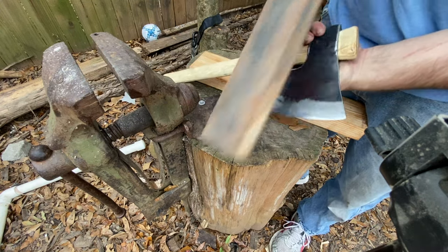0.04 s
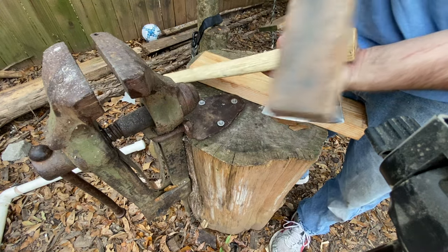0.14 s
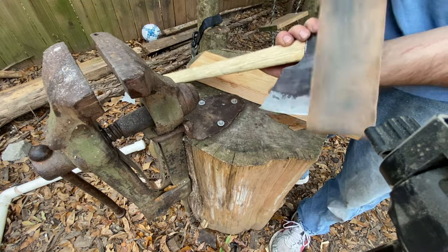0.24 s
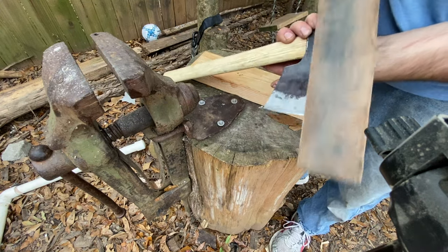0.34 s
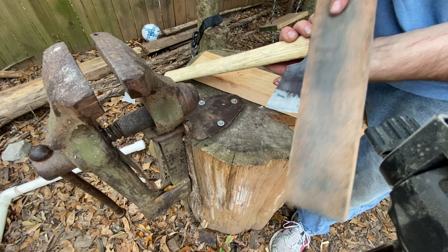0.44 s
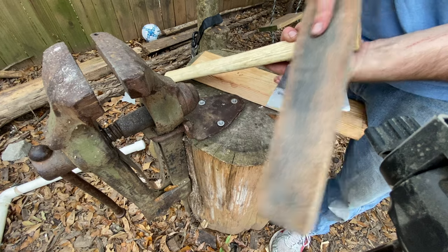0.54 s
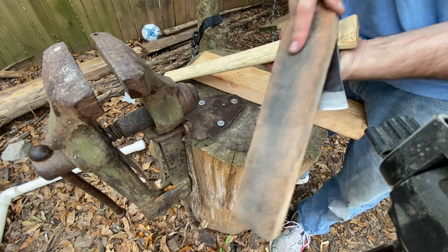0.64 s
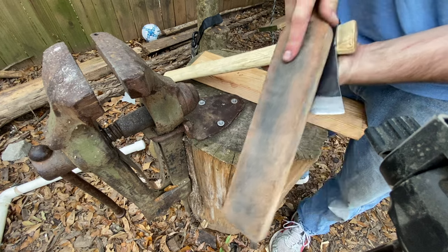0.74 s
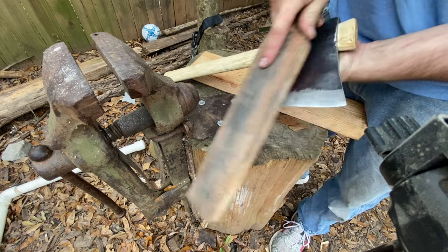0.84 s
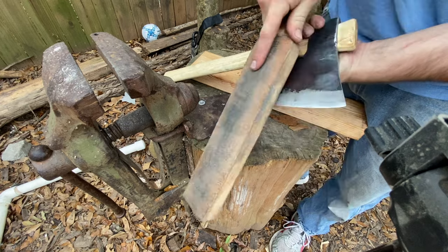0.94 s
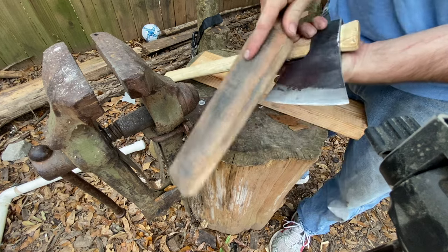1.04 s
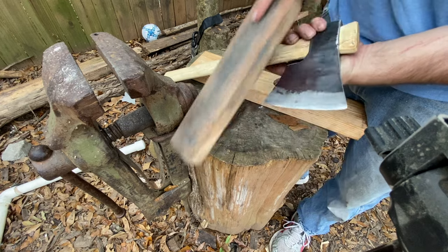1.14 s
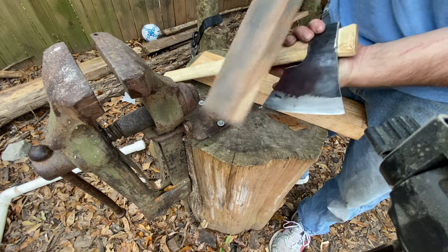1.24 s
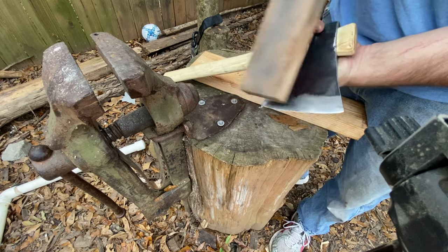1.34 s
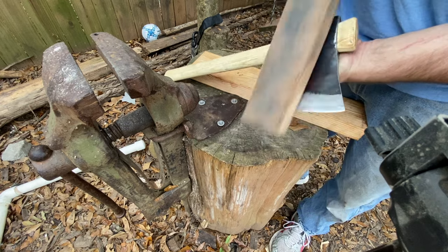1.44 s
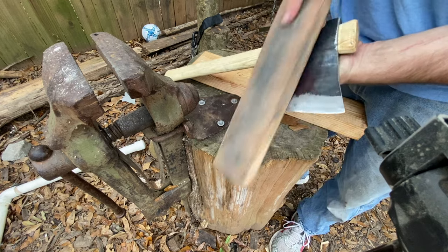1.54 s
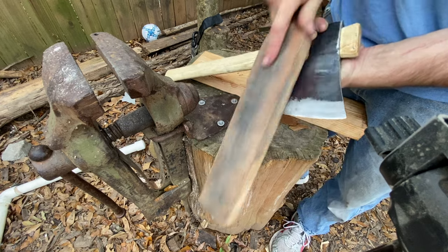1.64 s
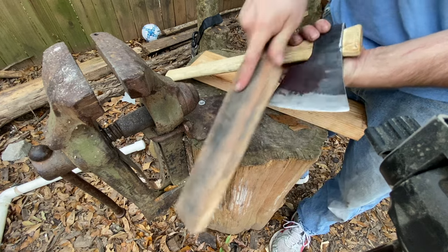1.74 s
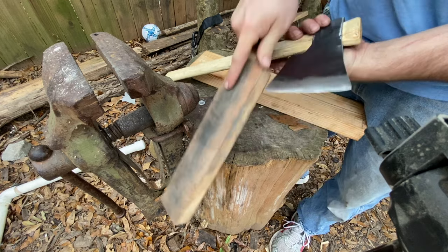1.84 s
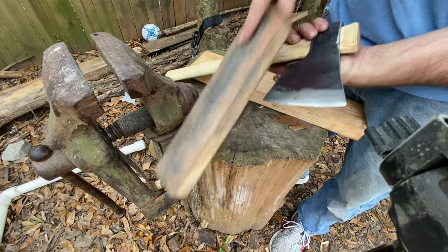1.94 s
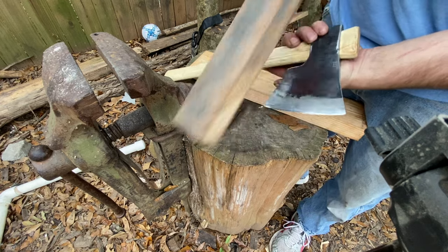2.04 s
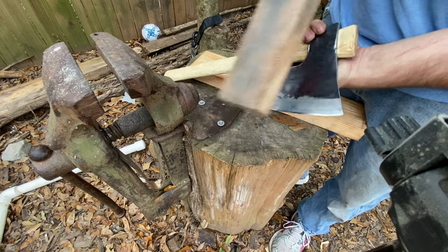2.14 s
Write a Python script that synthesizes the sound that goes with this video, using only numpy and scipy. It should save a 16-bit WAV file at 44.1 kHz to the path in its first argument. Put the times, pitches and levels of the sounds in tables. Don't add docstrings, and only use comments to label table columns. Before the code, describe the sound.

Wooden paddle knocks twice on a steel axe head, with thin scraping drags between, outdoors

```python
import sys
import numpy as np
from scipy import signal
from scipy.fft import rfft, irfft, next_fast_len
from scipy.io import wavfile
from scipy.ndimage import uniform_filter1d, map_coordinates

SR = 44100
rng = np.random.default_rng(int(sys.argv[2]) if len(sys.argv) > 2 else 0)


def level_to_linear(level):
    exponent = np.asarray(level, float) / 20
    return 10 ** exponent


def master(y):
    cut = np.clip(np.atleast_2d(y).T, -1, 1)
    pcm = np.round(cut * 32767)
    wavfile.write(sys.argv[1], SR, pcm.astype(np.int16))


N = 97020

WOOD_LAG_S = 0.00012


def unit(x):
    return x / np.sqrt(np.mean(x ** 2) + 1e-20)


def along(points, hz):
    f, v = np.transpose(points)
    return np.interp(np.log(hz + 1), np.log(f + 1), v)


def wobble(rate):
    knots = rng.standard_normal(int(N * rate / SR) + 4)
    return map_coordinates(knots, [np.arange(N) * rate / SR])


def filtered(x, response):
    m = next_fast_len(x.shape[-1] + 4096)
    spectrum = rfft(x, m) * response(np.fft.rfftfreq(m, 1 / SR))
    return irfft(spectrum, m)[..., :x.shape[-1]]


def panned(x, pan_db):
    return np.atleast_2d(x) * level_to_linear(np.array([[pan_db / 2], [-pan_db / 2]]))


def add(out, s, x, pan_db):
    k = max(round(s * SR), 0)
    part = panned(np.atleast_2d(x)[:, :N - k], pan_db)
    out[:, k:k + part.shape[1]] += part


def swell(middle_s, length_s):
    t = np.arange(N) / SR
    return np.exp(-(2 * (t - middle_s) / length_s) ** 4)


def hiss(hz, octaves, size):
    def bell(f):
        return np.exp(-(np.log2((f + 1) / hz) / octaves) ** 2 / 2)
    return unit(filtered(rng.standard_normal(size), bell))


def rush(spectrum, patchy_db):
    # (frequency [Hz], left-right likeness [-1 to 1])
    likeness = [(60, 0.92), (180, 0.97), (550, -0.33), (1650, 0.15), (4970, -0.084), (15000, 0.37)]
    z = signal.stft(rng.standard_normal((2, N)), nperseg=512)[2]
    field = uniform_filter1d(rng.standard_normal(z.shape[1:]), 6, 0)
    field = uniform_filter1d(field, 10, 1)
    pair = signal.istft(z * level_to_linear(patchy_db * unit(field)), nperseg=512)[1][:, :N]

    def mid_side_gain(hz):
        turn = np.arccos(np.clip(along(likeness, hz), -1, 1)) / 2
        return level_to_linear(along(spectrum, hz)) * [np.cos(turn), np.sin(turn)]

    mid, side = filtered(pair, mid_side_gain)
    return unit(np.array([mid + side, mid - side]))


def distance():
    # (frequency [Hz], density [dB per Hz])
    rumble_curve = [(13, -51), (22, -29.5), (40, -9), (70, -2), (110, -4), (129, -7.5), (151, -13),
                    (172, -17.5), (300, -24.5), (390, -45), (660, -120)]
    # (frequency [Hz], density [dB per Hz])
    air_curve = [(120, -13.5), (200, -1.5), (263, -14), (312, -8), (531, -4.5), (711, -3.5), (2610, -19),
                 (6940, -22.5), (12000, -43), (15600, -85), (22000, -120)]
    rumble = level_to_linear(-45 + 1.18 * wobble(3.7)) * rush(rumble_curve, patchy_db=0.7)
    air = level_to_linear(-53.5 + 0.19 * wobble(6.26)) * rush(air_curve, patchy_db=1.1)
    return panned(rumble + air, 2.5)


def sing(x):
    # (frequency [Hz], width [Hz], lift [dB])
    steel_bands = [(5100, 60, 0), (7210, 50, 4), (9060, 46, 2), (11370, 33, 1.5)]
    return filtered(x, lambda f: 1 + sum(level_to_linear(db) / (1 + ((f - hz) / w) ** 2) for hz, w, db in steel_bands))


def drag():
    # (time [s], level [dB])
    slide = [(0, -95), (.05, -74), (.235, -69), (.245, -57), (0.449, -61), (.63, -61.5), (.7, -69),
             (.85, -65.5), (1, -70), (1.2, -69.5), (1.37, -67), (1.385, -58), (1.55, -57), (1.74, -62),
             (1.79, -72), (1.95, -80), (2.1, -72), (2.2, -68)]
    # (frequency [Hz], density [dB per Hz])
    scrape_curve = [(1060, -38.5), (1800, -8), (2400, -2.5), (3900, -8), (9310, -4), (11000, -7.5),
                    (14300, -39), (22000, -120)]
    s, db = np.transpose(slide)
    unsteady_db = 1.4 * wobble(61) + 0.7 * wobble(14)
    loudness = level_to_linear(np.interp(np.arange(N) / SR, s, db) + unsteady_db)
    scrape = sing(rush(scrape_curve, patchy_db=0.6))
    top_band = level_to_linear(-9) * hiss(13400, 0.18, size=(2, N))
    return panned(loudness * (scrape + top_band), 2.5)


def grit():
    # (time [s], level [dB], centre [Hz], t60 [s], left over right [dB])
    ticks = [(0.0375, -46, 1250, 0.02, 5), (.038, -56, 2600, .012, 6), (.057, -62, 7000, .01, 9),
             (0.038, -55.5, 6800, 0.01, 11), (.047, -49, 900, 0.018, 12), (0.0615, -56, 1900, 0.022, 15),
             (.076, -56, 3000, .015, 18), (.125, -61, 5000, .01, 9), (0.1415, -61, 7360, 0.052, 5),
             (.192, -54, 4860, 0.017, 18.5), (1.2661, -50, 4200, 0.025, 17.5),
             (1.2665, -49.5, 9900, .01, 6), (1.266, -50, 820, 0.04, 7), (1.5315, -45, 11001, 0.032, 4),
             (1.534, -50, 3000, 0.013, -4), (1.656, -47.5, 1870, 0.024, 3), (1.672, -53, 10000, .02, 4),
             (1.871, -60, 4700, .012, 4), (1.972, -63, 8000, .01, 6), (2.028, -61, 7000, .02, 8),
             (2.115, -61, 7500, .03, 8), (2.157, -61, 8000, .02, 8)]
    out, t = np.zeros((2, N)), np.arange(SR // 10) / SR
    for s, db, hz, t60, pan_db in ticks:
        add(out, s, level_to_linear(db - 60 * t / t60) * hiss(hz, 0.4, size=len(t)), pan_db)
    return out


def sleeves():
    # (middle [s], length [s], level [dB], centre [Hz], left over right [dB])
    rustles = [
        (0.153, 0.026, -59.5, 7000, 15),
        (0.576, 0.059, -63, 7200, 10),
        (0.77, .04, -67, 9500, 1),
        (.843, 0.028, -57.5, 3500, -1),
        (.84, 0.03, -59, 10000, 0),
        (1.05, 0.095, -57, 6500, 11),
        (1.045, 0.08, -64, 2800, 12),
        (1.476, 0.079, -60, 5450, 4),
        (1.653, 0.062, -62, 6840, 11),
        (2.14, 0.2, -65, 7200, 12),
    ]
    out = np.zeros((2, N))
    for s, length, db, hz, pan_db in rustles:
        grain = unit(level_to_linear(2.5 * wobble(400)))
        add(out, 0, level_to_linear(db) * swell(s, length) * grain * hiss(hz, 0.328, size=(2, N)), pan_db)
    return out


def grip(hz, since_s):
    return level_to_linear(-1500 * np.maximum(since_s, 0) * (hz < 800))


def blow_noise(t):
    crack = level_to_linear(-23.5 - 60 * t / 0.005) * hiss(9500, 0.6, size=len(t))
    dust = level_to_linear(-29 - 60 * t / 0.094) * hiss(4410, 0.89, size=(2, len(t)))
    rise = 1 - np.exp(-t / 0.00051)
    thud = level_to_linear(-13 - 60 * t / 0.043) * rise * hiss(900, 0.9, size=(2, len(t)))
    return thud + crack + dust


def struck(blows, modes, lag_s, held_s, turns, noise_db):
    out, t = np.zeros((2, N)), np.arange(SR // 2) / SR
    hz, t60, *swing = np.transpose(modes)[:, :, None]
    u = np.maximum(t - np.array([lag_s, 0])[:, None, None], 0)
    build_up = 1 - np.exp(-u * hz / turns)
    ring = np.array(swing) * level_to_linear(-60 * u / t60) * np.sin(2 * np.pi * hz * u) * build_up
    for s, db, edge_hz in blows:
        push = 1 / (1 + (hz / edge_hz) ** 2)
        tone = (ring * grip(hz, t + s - held_s) * push).sum(1)
        add(out, s, level_to_linear(db) * (tone + level_to_linear(noise_db) * blow_noise(t)), 0)
    return out


def first_landing():
    # (frequency [Hz], t60 [s], left swing [signed], right swing [signed])
    end_modes = [(113, 0.195, 0.054, 0.058), (166, 0.181, -0.125, -0.12), (314, 0.08, 0.613, 0.383),
                 (408, 0.051, -0.672, -0.417), (513, 0.081, 0.143, 0.256), (688, 0.181, -0.037, 0.215),
                 (790, 0.018, 1.108, 2.118), (888, 0.072, 1.162, 1.814), (1163, 0.013, -3.457, -5.173),
                 (1273, 0.024, 2.067, 1.647), (1368, 0.095, 0.876, -1.162), (1433, 0.052, -2.301, -0.053),
                 (2366, 0.06, 0.952, -0.649), (2770, 0.024, 0.413, -0.415)]
    # (frequency [Hz], t60 [s], left swing [signed], right swing [signed])
    end_flat_modes = [(99, 0.054, 0.501, 0.466), (218, 0.017, 0.679, 0.596), (363, 0.016, 1.157, 0.943),
                      (431, 0.012, 2.025, 1.337), (582, 0.015, 0.412, 0.99), (760, 0.015, 1.062, -0.018),
                      (961, 0.06, -0.124, -0.127), (1217, 0.016, -0.505, -0.413),
                      (1350, 0.02, 1.61, -1.079), (1788, 0.007, 0.582, -0.679),
                      (2129, 0.021, 0.291, -0.182), (2861, 0.029, 0.413, 0.122)]
    # (time [s], level [dB], hardness as where the push fades [Hz])
    end_blows = [
        (0.23996, -3.0, 860),
        (0.24164, -16.5, 8180),
        (0.24389, -20.6, 8180),
    ]
    # (time [s], level [dB], hardness as where the push fades [Hz])
    end_rebounds = [
        (0.24921, -9.0, 1460),
        (0.25491, -22.8, 8180),
        (0.25999, -9.5, 880),
        (0.26383, -16.4, 330),
        (0.268, -19.8, 770),
    ]
    knock = struck(end_blows, end_modes, WOOD_LAG_S, 0.273, turns=0.83, noise_db=-8)
    rebound = struck(end_rebounds, end_flat_modes, WOOD_LAG_S, 0.272, turns=1.11, noise_db=-12)
    return knock + rebound


def yard(x):
    # (frequency [Hz], t60 [s])
    yard_decay = [(200, 0.11), (1500, 0.16), (8000, 0.064)]
    hz, t, z = signal.stft(rng.standard_normal((2, SR // 4)), SR, nperseg=256)
    tail = signal.istft(z * level_to_linear(-60 * t / along(yard_decay, hz)[:, None]), SR, nperseg=256)[1]
    late = np.pad(x, ((0, 0), (200, 0)))
    return signal.fftconvolve(late, tail / np.linalg.norm(tail[0]), axes=1)[:, :N]


def axe_head():
    # (time [s], level [dB], frequency [Hz], t60 [s])
    after_rings = [
        (.26, -48, 1366, .41),
        (.27, -58, 2340, .36),
        (.241, -45, 3756, .077),
        (.241, -47, 3020, .061),
        (.265, -45, 665, .11),
        (.241, -44, 2150, .07),
        (1.377, -54, 3914, .14),
        (1.377, -56, 5300, .07),
        (1.3775, -33, 3000, .014),
        (1.455, -57, 1200, .07),
    ]
    out, t = np.zeros((2, N)), np.arange(N) / SR
    for s, db, hz, t60 in after_rings:
        add(out, s, level_to_linear(db - 60 * t / t60) * hiss(hz, 0.028, size=N), 1)
    return out


def squeaks():
    # (middle [s], length [s], level [dB], frequency [Hz])
    rubs = [
        (.786, .027, -62, 4550),
        (.78, .014, -65, 3950),
        (.773, .02, -67, 7200),
        (.837, .009, -61, 4700),
        (.842, .013, -60, 3600),
        (.851, .006, -60, 4800),
        (.848, .012, -60, 2500),
    ]
    out = np.zeros((2, N))
    for s, length, db, hz in rubs:
        add(out, 0, level_to_linear(db) * swell(s, length) * hiss(hz, 0.08, size=N), 1)
    return out


def second_landing():
    # (frequency [Hz], t60 [s], left swing [signed], right swing [signed])
    mid_modes = [(131, 0.107, 0.046, -0.009), (222, 0.111, -0.058, 0.001), (370, 0.013, 0.544, 0.053),
                 (504, 0.086, -0.105, -0.22), (564, 0.042, 1.004, 0.57), (632, 0.007, -2.262, -0.455),
                 (926, 0.021, -0.178, -0.198), (1261, 0.024, 0.503, 0.53), (1317, 0.092, 0.082, 0.016),
                 (1447, 0.01, -0.6, -0.596), (1983, 0.018, -0.08, -0.147), (2224, 0.007, -0.573, -0.51),
                 (2516, 0.007, -0.407, 0.295), (2745, 0.006, 0.623, 0.412)]
    # (frequency [Hz], t60 [s], left swing [signed], right swing [signed])
    mid_flat_modes = [(640, 0.04, 0.843, -0.286), (1367, 0.081, -0.036, 0.185), (2335, 0.04, 0.049, -0.012)]
    # (time [s], level [dB], hardness as where the push fades [Hz])
    mid_blows = [
        (1.37662, -12.0, 750),
        (1.37733, -3.4, 1480),
        (1.37751, -8.1, 8180),
        (1.37993, -6.4, 1040),
    ]
    # (time [s], level [dB], hardness as where the push fades [Hz])
    mid_rebounds = [
        (1.39807, -22.0, 8180),
    ]
    knock = struck(mid_blows, mid_modes, WOOD_LAG_S, 1.395, turns=0.1, noise_db=-13)
    rebound = struck(mid_rebounds, mid_flat_modes, WOOD_LAG_S, 1.395, turns=0.1, noise_db=-15)
    return knock + rebound


def steel_flick():
    # (frequency [Hz], t60 [s], left swing [signed], right swing [signed])
    steel_modes = [(760, 0.011, 1.6, 0.57), (520, 0.019, -1.45, -.75), (1326, 0.036, 0.24, 0.28),
                   (2357, 0.059, -1.25, -.9), (2840, .05, .45, 0.47), (3920, .12, -0.17, -0.1),
                   (7180, 0.17, 0.22, 0.17), (9160, .066, -0.21, -0.2), (11300, .14, 0.3, 0.26)]
    # (time [s], level [dB], hardness as where the push fades [Hz])
    flicks = [
        (1.7528, -36.5, 11000),
        (2, -59, 2600),
    ]
    return struck(flicks, steel_modes, WOOD_LAG_S * 0.21, 1.77, turns=0.52, noise_db=3.5)


def scene():
    quiet = distance() + drag() + grit() + sleeves() + axe_head() + squeaks()
    knocks = [first_landing(), second_landing(), steel_flick()]
    return sum(k + level_to_linear(-25) * yard(k) for k in knocks) + quiet


def low_pass(x):
    return signal.sosfilt(signal.butter(12, 15930, fs=SR, output="sos"), x)


def record(dry):
    # (frequency [Hz], gain [dB])
    mic_curve = [(22, -10), (40, 0), (11350, 0), (11650, -30), (12750, -30), (13050, 0), (14900, 0),
                 (15400, -20)]
    heard = filtered(dry, lambda hz: level_to_linear(along(mic_curve, hz)))
    mix = heard / (1 + np.abs(heard) ** 6) ** (1 / 6)
    return low_pass(mix)


dry = scene()
out = record(dry)
master(out)
```